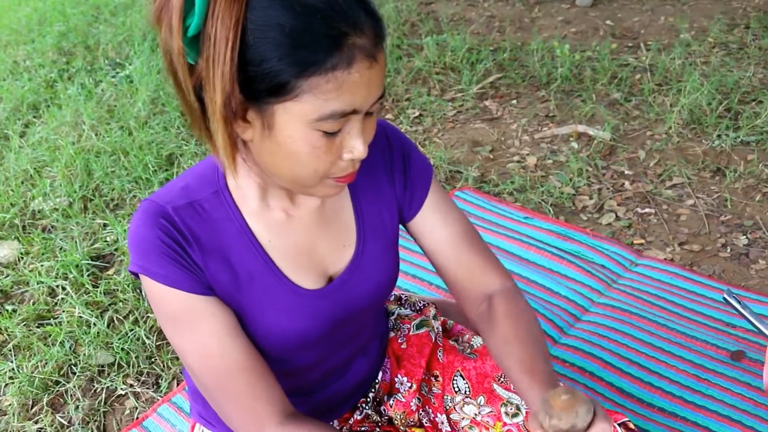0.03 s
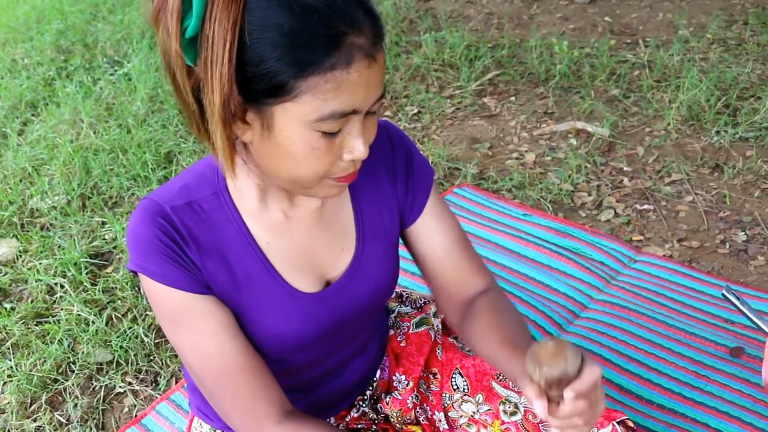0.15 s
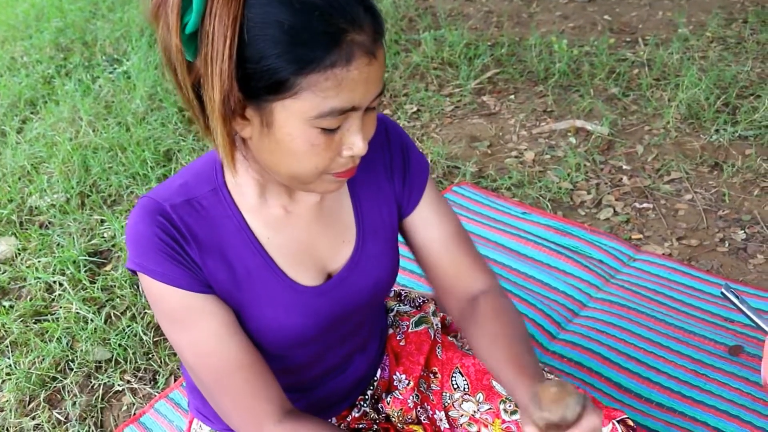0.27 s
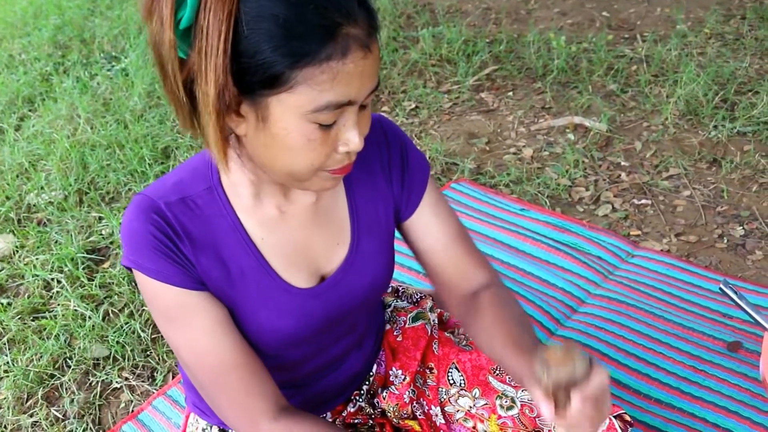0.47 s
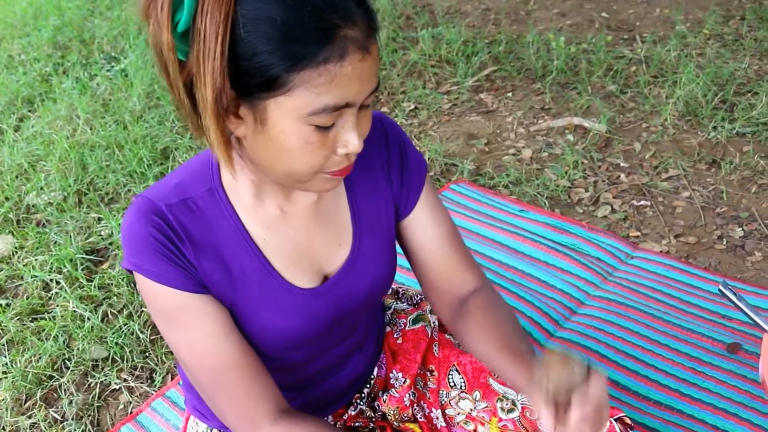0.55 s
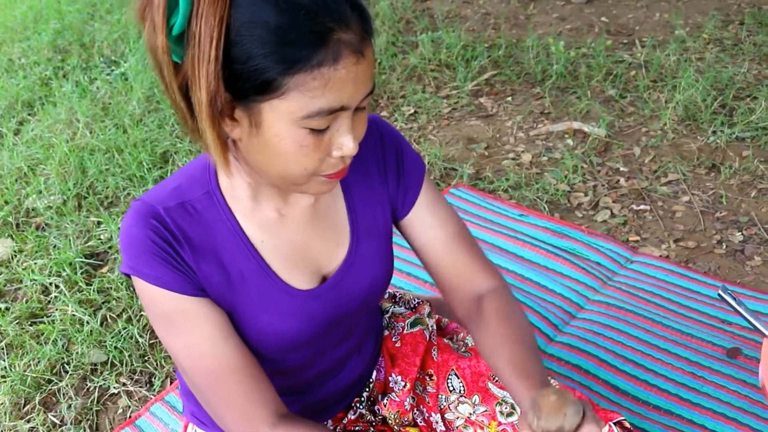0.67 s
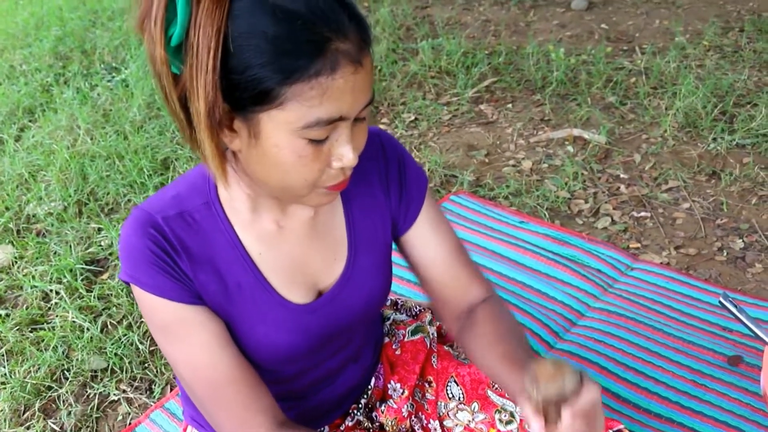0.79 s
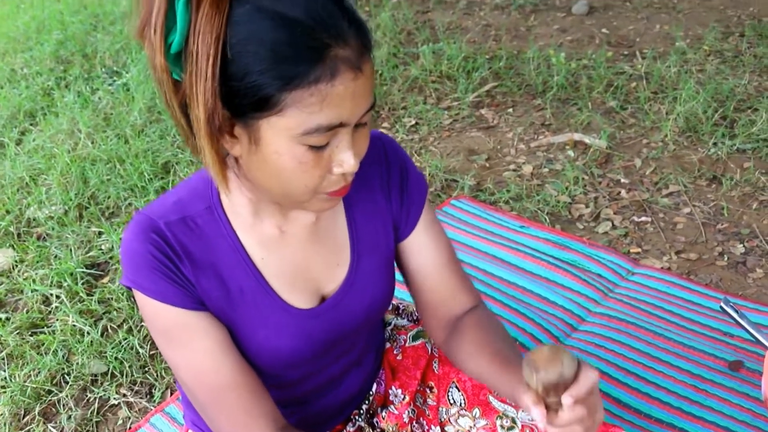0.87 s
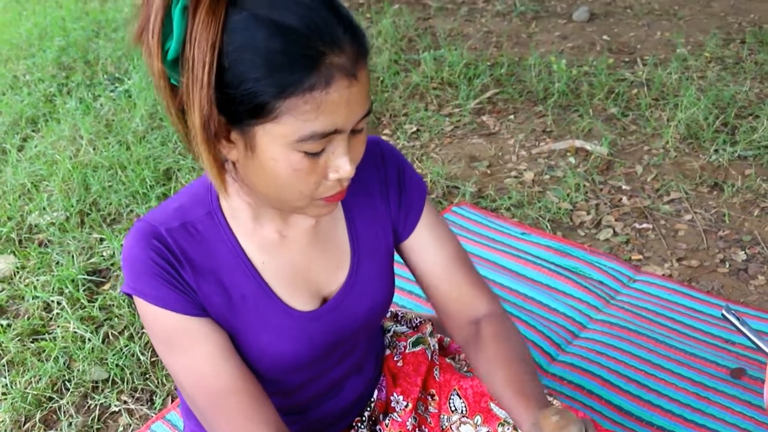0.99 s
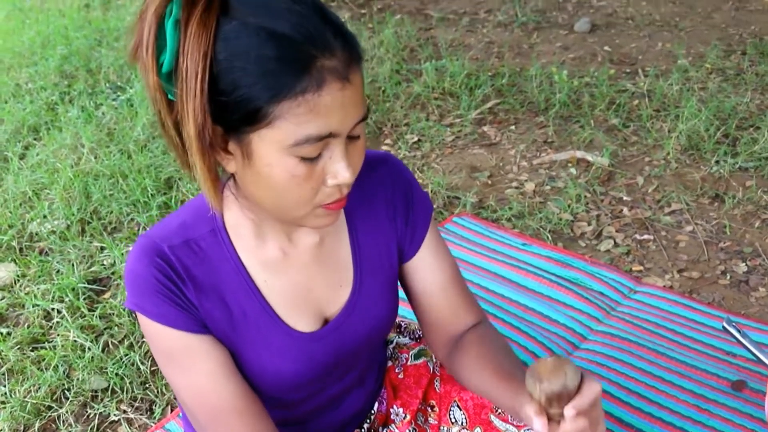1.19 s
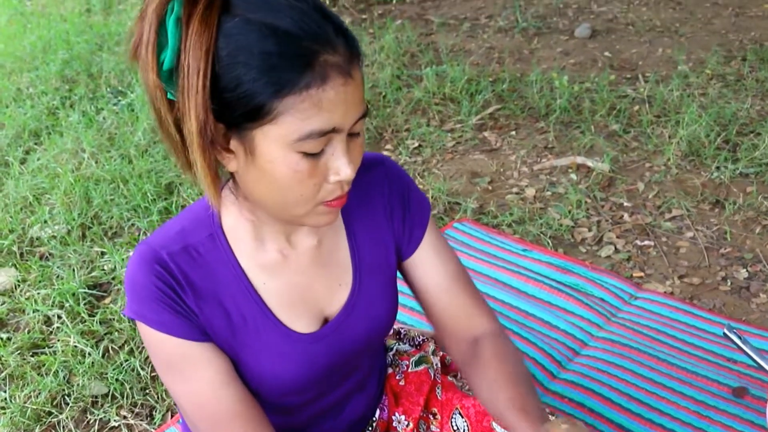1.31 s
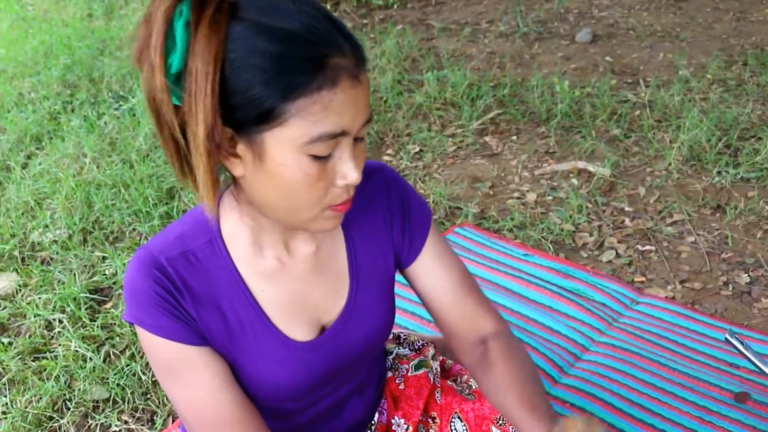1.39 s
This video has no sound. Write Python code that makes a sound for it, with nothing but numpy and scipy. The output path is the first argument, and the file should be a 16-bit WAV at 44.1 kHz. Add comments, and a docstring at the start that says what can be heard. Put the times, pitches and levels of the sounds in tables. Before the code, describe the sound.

Pestle pounding in a mortar outdoors: a loud hollow knock, then three soft, wet crushing thuds

```python
"""A wooden pestle pounds chillies and garlic in a mortar outdoors, near two microphone ports.
The first blow rings the bare mortar's modes, hard enough to overload; later ones are softer, with padded thuds.
Crushed wet pods are dense random cracks and hiss; bursting skins are short damped cycles.
A far engine drone, low wind rumble and high insect chirring are narrow noise bands.
Open-air hiss lies behind: shaped noise in drifting patches."""
import sys
import numpy as np
from scipy import signal
from scipy.fft import rfft, irfft
from scipy.io import wavfile
from scipy.ndimage import uniform_filter1d

SR = 44100
rng = np.random.default_rng(int(sys.argv[2]) if len(sys.argv) > 2 else 0)


def field_ratio(decibels):
    """Amplitude ratio for a level in dB (20 dB per decade); scalars and array-likes work."""
    return 10 ** (np.asarray(decibels, dtype=float) / 20)


def generate_wav(sig):
    """Save sig (samples, or channels by samples) to the path in sys.argv[1] as 16-bit PCM at SR."""
    pcm = np.round(np.clip(np.atleast_2d(sig).T, -1, 1) * 32767).astype(np.int16)
    wavfile.write(sys.argv[1], SR, pcm)


N = 63945
CRUSH_LEAD_S = .00007  # left port first
AIR_LAG_S = .0001  # right port first


def evened(x):
    """Scales to unit rms."""
    return x / np.sqrt(np.mean(x ** 2) + 1e-20)


def read(points, hz):
    """Interpolates a table over log frequency."""
    f, value = np.transpose(points)
    return np.interp(np.log(hz + 1), np.log(f + 1), value)


def add(mix, start_s, sound):
    """Mixes a sound in at a time."""
    part = mix[round(start_s * SR):][:len(sound)]
    part += sound[:len(part)]


def ports(x, lead_s, pan_db=0.):
    """One sound at two ports: the right one is delayed by lead_s; pan_db is left minus right."""
    hz = np.fft.rfftfreq(N, 1 / SR)
    delayed = irfft(rfft(x) * np.exp(-2j * np.pi * hz * lead_s), N)
    return np.array([field_ratio(pan_db / 2) * x, field_ratio(-pan_db / 2) * delayed])


def drift(top_hz, t, low=0.073):
    """Unit-rms chance wavering: sines of random phase from low * top_hz up to top_hz."""
    rates_hz = top_hz * np.geomspace(low, 1, num=24)
    return evened(sum(np.sin(2 * np.pi * (rate_hz * t + rng.random())) for rate_hz in rates_hz))


def whistle(hz, width_hz):
    """Unit-rms noise in one narrow band: a doubled one-pole lowpass shifted up to hz."""
    r = np.exp(-np.pi * width_hz / SR)
    noise = rng.standard_normal((2 * N, 2)) @ [1, 1j]
    fuzz = signal.lfilter([1], np.convolve([1, -r], [1, -r]), noise)[N:]  # settled half
    return evened((fuzz * np.exp(2j * np.pi * hz * np.arange(N) / SR)).real)


def bursts(rows):
    """Each row is a few damped cycles: a sine under a rise-and-decay envelope."""
    t, out = np.arange(4000) / SR, np.zeros(N)
    for start_s, peak_db, hz, cycles in rows:
        u = t * hz / cycles * 3  # envelope peaks at u = 1
        add(out, start_s, field_ratio(peak_db) * u * np.exp(1 - u) * np.sin(2 * np.pi * hz * t))
    return out


def knocks():
    """A bell-shaped push of the pestle rings the mortar; the light first touch acts the other way."""
    # pestle meets mortar: (time [s], force [dB], contact half-width [s])
    blows = [(.22451, -16, .00011), (.22538, 0, .000087), (.5532, -33, .0002), (.5642, -30, .0002),
             (.5692, -35, .0002), (.8977, -33, .0002), (1.2362, -38, .00025)]
    # mortar modes: (frequency [Hz], level [dB], t60 [s], sense in or out [+1/-1])
    modes = [(163, -30, .06, 1), (371, -17, .016, -1), (677, -3, .0165, 1), (777, -6, .0145, 1),
             (870, -20, .07, 1), (1009, -11, .066, -1), (1352, -13, .031, -1), (1456, -3.7, .012, -1),
             (1869, -20, .012, -1), (2419, -14, .022, 1), (2750, 6.4, .002, -1), (3719, 13.2, .0004, 1),
             (45, -36, .08, 1), (3300, -22, .035, 1)]
    t, force = np.arange(N) / SR, np.zeros(N)
    ring_t = t[:8000]
    ring = np.zeros(len(ring_t))
    for hz, db, t60_s, sense in modes:
        decay = field_ratio(db - 60 * ring_t / t60_s)
        ring += np.sign(sense) * decay * np.sin(2 * np.pi * hz * ring_t)
    for k, (time_s, db, contact_s) in enumerate(blows):
        push = np.exp(-((t - time_s) / contact_s) ** 2 / 2)
        force += (1 if k else -1) * field_ratio(db) * push / push.sum()
    return signal.oaconvolve(force, ring)[:N]


def thuds():
    """Padded thuds of the pestle through the paste, as low damped cycles."""
    # (start [s], envelope peak [dB], frequency [Hz], cycles [count])
    thud_rows = [(.5525, -36, 450, 3.), (.5665, -35, 480, 3.), (.8975, -35, 420, 2.),
                 (1.2345, -37, 350, 1.5), (1.2495, -37, 130, .7), (.9037, -33, 170, .7)]
    return bursts(thud_rows)


def crush():
    """Wet pods crushed under each blow: dense tiny cracks and hiss under its envelope."""
    # (start [s], rise [s], t60 [s], level [dB], treble relative to that level [dB])
    crushes = [(.2254, .0005, .014, -29, 0), (1.238, .003, .08, -37, -7), (.228, .003, .06, -44, -3),
               (.550, .003, .04, -34, 0), (.5622, .0005, .025, -36, 0), (.563, .004, .12, -42, -3),
               (.884, .006, .06, -50, -6), (.8955, .001, .05, -35, 2), (.908, .008, .1, -43, -2),
               (1.231, .005, .05, -41, -6)]
    # crush spectrum: (frequency [Hz], relative level [dB per Hz])
    spectrum = [(760, -30), (1300, -19), (2160, -14), (2480, -11), (5210, -5.5), (8040, -6), (9630, -10.5),
                (12500, -16.5), (16400, -34)]
    cracks_per_s, crack_spread_db = 3500, 3.5
    squelch = .6  # wet hiss rms over crack rms
    treble_from_hz = 5800
    same = .75  # likeness of ports
    t, hz = np.arange(N) / SR, np.fft.rfftfreq(N, 1 / SR)
    low_level, treble_level = np.zeros(N), np.zeros(N)
    for start_s, rise_s, t60_s, db, treble_db in crushes:
        decay = field_ratio(db - 60 * np.maximum(t - start_s - rise_s, 0) / t60_s)
        shape = np.clip((t - start_s) / rise_s, 0, 1) * decay
        low_level += shape
        treble_level += shape * field_ratio(treble_db)
    size = field_ratio(crack_spread_db * np.minimum(rng.exponential(1, (2, N)), 4))
    size *= rng.choice([-1, 1], (2, N))
    cracks = evened(size * (rng.random((2, N)) < cracks_per_s / SR))
    drive = cracks + squelch * rng.standard_normal((2, N))
    whole = evened(irfft(rfft(drive) * field_ratio(read(spectrum, hz)), N))
    low = irfft(rfft(whole) / (1 + (hz / treble_from_hz) ** 4), N)
    near, other = low_level * low + treble_level * (whole - low)
    left, right = ports(near, CRUSH_LEAD_S)
    return np.array([left, same * right + np.sqrt(1 - same ** 2) * other])


def snaps():
    """Single skins bursting as damped cycles, heard first at the left port."""
    # (start [s], envelope peak before pan [dB], frequency [Hz], cycles [count])
    snap_rows = [(.5524, -21, 4200, 3.), (.5530, -29, 8500, 4.), (.5541, -25, 2600, 3.),
                 (.8964, -33, 11500, 5.), (.9009, -25, 2500, 1.3), (.9010, -34, 12500, 3.),
                 (.9189, -33, 4000, 1.5), (1.2347, -35, 4300, 4.), (1.2348, -35, 2000, 1.5),
                 (1.2456, -32, 3200, 3.), (.5623, -18, 4000, .8), (.8958, -26, 4400, 8.),
                 (1.2397, -26, 4100, 7.)]
    return ports(bursts(snap_rows), CRUSH_LEAD_S, -1.9)


def yard(x):
    """One dull echo and a faint scattered tail from ground and trees."""
    echo_s, echo_db, echo_hz, echo_q = .035, -19, 620, 11.
    tail_db, tail_t60_s, tail_lowpass_hz = -39.5, 0.9, 1520
    t = np.arange(SR // 2) / SR
    tail = rng.standard_normal((2, len(t))) * field_ratio(-60 * t / tail_t60_s) * np.minimum(t / echo_s, 1)
    tail = tail + tail[::-1] / 2  # partly alike at the ports
    tail = signal.lfilter(*signal.butter(2, tail_lowpass_hz, fs=SR), tail)
    tail *= field_ratio(tail_db) / np.linalg.norm(tail[0])
    wet = signal.fftconvolve(x[None], tail, axes=1)[:, :N]
    echo = signal.lfilter(*signal.iirpeak(echo_hz, echo_q, fs=SR), x)
    return wet + field_ratio(echo_db) * np.roll(echo, round(echo_s * SR))


def drone():
    """Low wavering engine orders from far off, each a narrow noise band."""
    # (frequency [Hz], width [Hz], rms level [dB])
    orders = [(60.5, 4.5, -60.5), (90.1, 7.3, -57), (121.1, 9.7, -56.5)]
    return ports(sum(field_ratio(db) * whistle(hz, width_hz) for hz, width_hz, db in orders), -AIR_LAG_S)


def wind():
    """A low lumpy rumble that comes and goes: narrow noise under a level curve."""
    # (time [s], level [dB])
    gusts = [(0.0, -64), (0.1, -60), (0.424, -69), (0.698, -64), (0.872, -73), (1.05, -56), (1.142, -70),
             (1.324, -75), (1.45, -72)]
    level_db = np.interp(np.arange(N) / SR, *np.transpose(gusts))
    return field_ratio(level_db) * whistle(hz=39.7, width_hz=20)


def insects():
    """Chirring: narrow fuzzy whistles that throb unevenly."""
    # (frequency [Hz], width [Hz], rms level before pan [dB], top throb rate [1/s],
    #  throb depth [dB], left lag [s])
    chirrs = [(6655, 22, -65, 25., 2.5, .00008), (6640, 90, -67, 20., 2., .00002),
              (6430, 130, -67, 16., 3., .000055), (6790, 45, -70, 14., 4., .00007)]
    t, out = np.arange(N) / SR, np.zeros((2, N))
    for hz, width_hz, db, throbs_per_s, depth_db, lag_s in chirrs:
        throb = field_ratio(depth_db * drift(throbs_per_s, t, low=.4))
        out += ports(field_ratio(db) * evened(whistle(hz, width_hz) * throb), -lag_s, pan_db=-2.)
    return out


def air():
    """Distant rumble and hiss: shaped noise in drifting patches, the shared part first at the right."""
    # air spectrum: (frequency [Hz], relative level [dB per Hz])
    spectrum = [(32, -40), (55, -4.5), (124, -2.5), (181, -9), (379, -3.5), (458, -6), (610, -8),
                (671, -12.5), (793, -8.5), (1410, -8.5), (1660, -12), (2010, -10.5), (4110, -23),
                (6610, -22), (7100, -25.5), (13800, -38), (16400, -44)]
    # (frequency [Hz], likeness of ports [0-1])
    likeness = [(40, 0.97), (200, .98), (700, 0.91), (1500, 0.52), (2500, 0.95), (4500, 0.23), (8000, 0.79),
                (15000, 0.091)]
    # (frequency [Hz], left minus right [dB])
    pan_points = [(60, 1), (180, 1.5), (550, 2.5), (1650, -1.5), (4970, -2.5), (15000, -0.5)]
    level_db, patch_db, swell_db, swell_top_hz = -42.5, 2, 0.98, 6.36
    frames, hz = N // 512 + 5, np.fft.rfftfreq(2048, 1 / SR)
    a, b, c, d, patches = rng.standard_normal((frames, 1025, 5)).T
    patches = uniform_filter1d(patches, size=20, axis=0)  # over frequency
    patches = evened(uniform_filter1d(patches, size=5, axis=1))  # over time
    same = np.clip(read(likeness, hz), 0, 1)[:, None]
    ahead = np.exp(2j * np.pi * hz * AIR_LAG_S)[:, None]
    pan = field_ratio(read(pan_points, hz) / 2)[:, None]
    left = a + 1j * b
    right = same * ahead * left + np.sqrt(1 - same ** 2) * (c + 1j * d)
    z = np.array([pan * left, right / pan])
    swell = drift(swell_top_hz, np.arange(frames) * 512 / SR)
    z *= field_ratio(read(spectrum, hz)[:, None] + patch_db * patches + swell_db * swell)
    return field_ratio(level_db) * evened(signal.istft(z, nperseg=2048, noverlap=1536)[1][:, :N])


def scene():
    """Sums the mortar, its yard reflections, the pods and the background at two ports."""
    mortar = knocks() + thuds()
    near = ports(mortar, lead_s=.00003, pan_db=2.4) + yard(mortar) + crush() + snaps()
    return near + drone() + wind() + insects() + air()


def band_limit(x):
    """A steep low-pass at the top of the band."""
    return signal.sosfilt(signal.butter(12, 16500, fs=SR, output="sos"), x)


def record(dry):
    """Gain control dips after the loud knock and recovers steadily; peaks clip."""
    duck_from_db, duck_share, recovery_db_per_s, ceiling = -30, .24, 70., .955
    power = uniform_filter1d((dry ** 2).mean(0), size=200, origin=99)  # trailing mean
    power_db = 10 * np.log10(abs(power) + 1e-12)
    fall_db = np.arange(N) * recovery_db_per_s / SR
    duck_db = np.maximum(power_db - duck_from_db, 0) * duck_share
    duck_db = np.maximum(np.maximum.accumulate(duck_db + fall_db) - fall_db, 0)
    ducked = dry / field_ratio(uniform_filter1d(duck_db, size=900, origin=449))
    return band_limit(np.clip(ducked, -ceiling, ceiling))


dry = scene()
out = record(dry)
generate_wav(out)
```